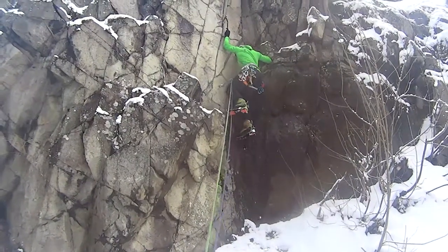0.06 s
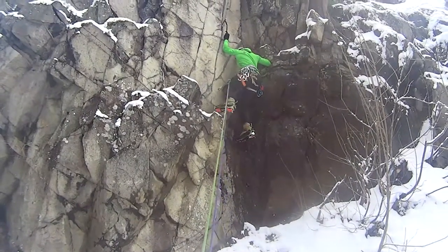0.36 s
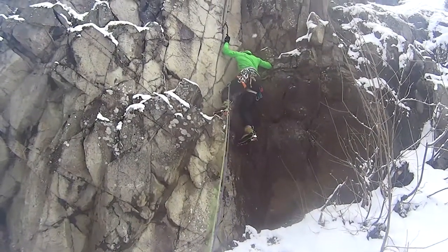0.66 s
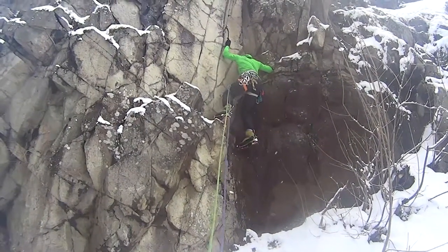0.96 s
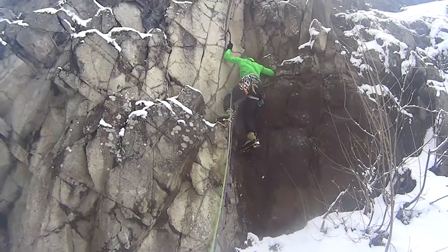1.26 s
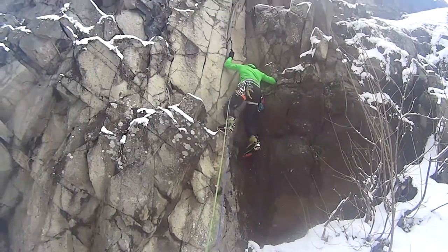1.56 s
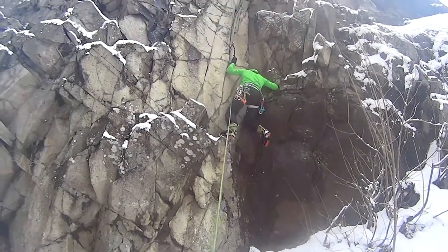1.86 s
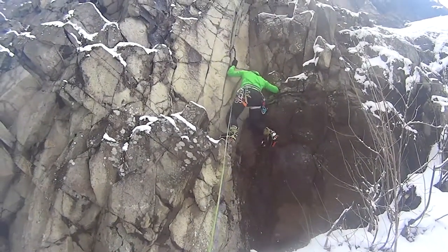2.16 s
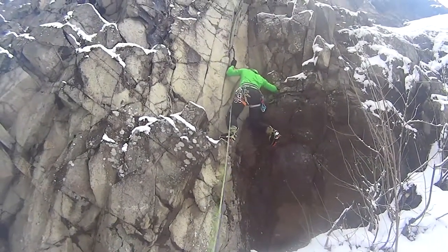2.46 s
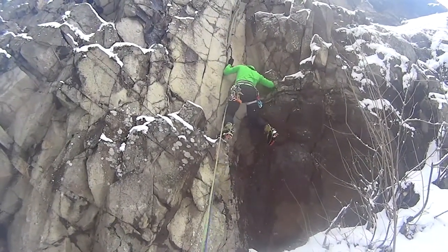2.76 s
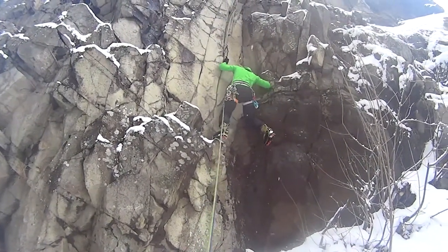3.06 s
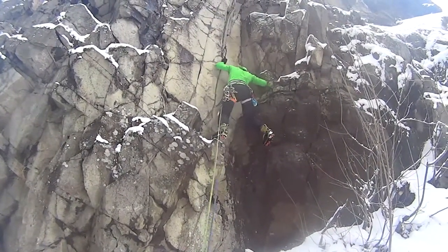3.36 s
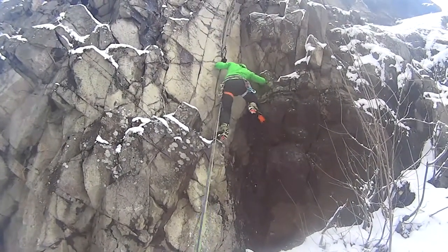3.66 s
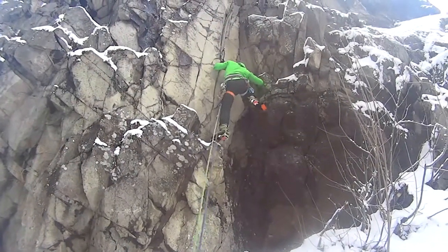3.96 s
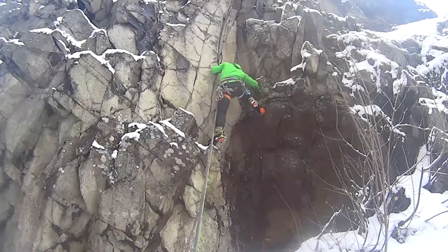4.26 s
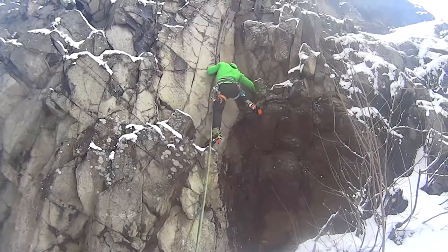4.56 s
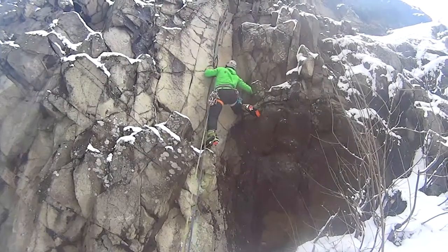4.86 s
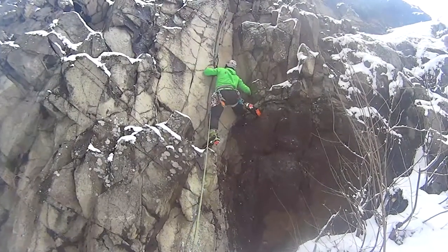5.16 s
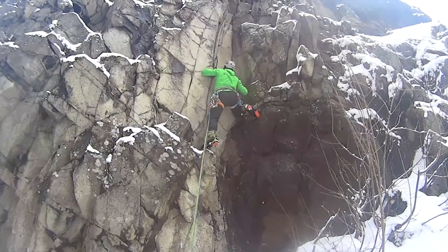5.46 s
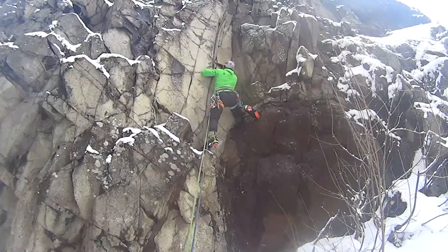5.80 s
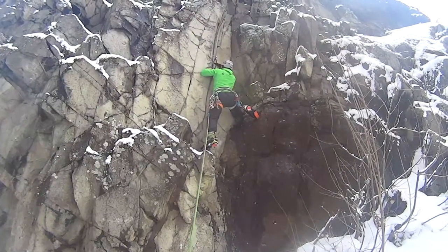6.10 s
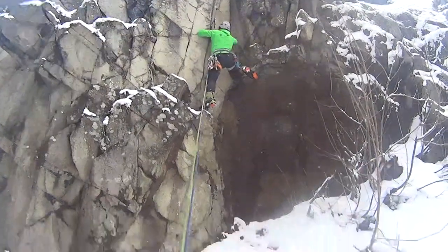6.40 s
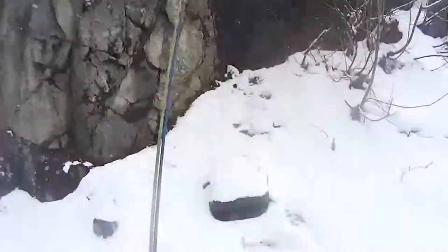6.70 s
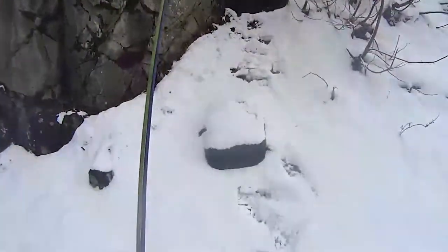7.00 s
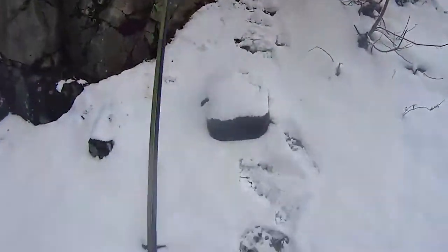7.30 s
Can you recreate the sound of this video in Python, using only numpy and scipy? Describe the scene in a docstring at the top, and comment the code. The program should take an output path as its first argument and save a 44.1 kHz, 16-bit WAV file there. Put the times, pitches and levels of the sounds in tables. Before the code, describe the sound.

Outdoors at a snowy cliff, a climber's steel picks and boot spikes tap and scratch the rock in uneven clusters, with a faint echo. Carabiners clink on the harness and loose grit ticks. The strikes and jingling grow busiest just past the middle, then thin out. At the end, close to the microphone, a hood rustles faintly, the camera case bumps softly and metal rope gear snaps. Soft air hiss continues throughout.

```python
"""Climbing a snowy crag

Steel picks and crampons (boot spikes) strike and scratch the rock, and carabiners (metal clips) clink
on the harness. The cliff returns a faint echo, and the air hisses softly. At the end the belayer, who
holds the rope, looks down: a hood rustles, the camera case bumps and the rope gear snaps close by."""
import sys
import numpy as np
from scipy import signal
from scipy.fft import rfft, irfft
from scipy.io import wavfile
from scipy.ndimage import uniform_filter1d

SR = 44100
rng = np.random.default_rng(int(sys.argv[2]) if len(sys.argv) > 2 else 0)


def bounce(signal):
    """Save signal as a 16-bit WAV file at the path given by the first command-line argument."""
    frames = np.transpose(np.atleast_2d(signal))
    limited = np.clip(frames, -1, 1)
    pcm = np.round(limited * 32767).astype(np.int16)
    wavfile.write(sys.argv[1], SR, pcm)


N = 332514
HIT_SAMPLES = 4096
HZ = np.fft.rfftfreq(HIT_SAMPLES, 1 / SR)  # the frequencies in one hit

# Levels in all tables are relative. A "colour" says how strong each frequency is.
# steel hitting rock: t/s, skid length/s, level/dB, dull rock/dB, bright steel/dB, ring f/Hz
STRIKES = [(0.179, .001, -57, 5, -1, 1190), (0.31, 0.00042, -54, 15, -5, 2500),
           (0.5365, 0.0018, -45, -20, 4, 5230), (0.5479, 0.0055, -31.5, -4, 1, 2520),
           (0.552, 0.0052, -28.5, -0.5, 5.5, 3320), (0.893, 0.013, -45.5, 6, -2.5, 3160),
           (0.941, 0.007, -48.5, 5, -4, 4630), (0.974, 0.021, -42.5, 1, 1, 2360),
           (1.107, 0.005, -36.5, 2, 0.5, 4400), (1.192, 0.0023, -41, 4, -0.5, 4520),
           (1.302, 0.0033, -45.5, -30, 15, 7360), (1.313, 0.009, -37.5, -0.5, -3, 2450),
           (1.649, 0.0071, -43.5, 0, 2, 2760), (1.665, 0.023, -33.5, 3, 5.5, 3070),
           (1.699, .004, -37.5, -2, -1, 4330), (1.713, .003, -44.5, 4, 2, 3000),
           (1.77, 0.0049, -24, -10, 4.5, 8000), (1.777, 0.0043, -32.5, 6, 4.5, 7900),
           (1.812, 0.014, -37, -1, 2, 5450), (1.829, 0.0053, -34, 1, 1.5, 5080),
           (1.896, 0.0022, -35, -19, 12.5, 6400), (2.165, 0.0077, -40, 0, -1, 1440),
           (2.195, 0.031, -34.5, 5.5, -2.5, 1660), (2.226, 0.0052, -38, 8, 1.5, 6300),
           (2.306, 0.0026, -43, 3.5, -4, 2630), (2.339, 0.0037, -42, 4, 1, 2940),
           (2.452, 0.0069, -47, 8.5, 0.5, 4880), (2.5745, 0.00067, -35.5, 1.5, 11.5, 6260),
           (2.801, 0.016, -49.5, -16, 1, 6200), (2.896, .011, -28.5, -2, -0.5, 4280),
           (2.916, 0.003, -35, 2.5, -9, 2800), (2.927, 0.017, -28, 4, 1.5, 4460),
           (2.967, 0.0029, -33, 8, 6.5, 2940), (3.001, 0.0038, -44.5, 6, -14, 1450),
           (3.043, 0.0056, -41, 10, -7.5, 1210), (3.182, 0.0013, -45.5, 11.5, -7, 2750),
           (3.572, 0.023, -44.5, -6, -1, 4770), (3.597, .016, -34.5, 4.5, 2.5, 4800),
           (3.606, 0.0055, -33.5, -4, -2.5, 4860), (3.632, 0.0156, -30.5, -2, 3, 3370),
           (3.882, 0.0053, -43.5, -22, 1, 3620), (3.936, 0.0039, -41, 1.5, 4, 5020),
           (4.0367, 0.0028, -21, -7, -1.5, 4920), (4.0415, 0.02, -35, -1, -1, 4480),
           (4.203, 0.013, -36, -5, -8, 3370), (4.218, 0.0046, -44, -9, -3, 8350),
           (4.523, 0.00077, -38, -28, 25, 9100), (4.603, 0.0059, -25, -3.5, 3.5, 3150),
           (4.653, .0044, -32, 1, 2.5, 5300), (4.662, 0.0019, -33.5, 6.5, -6, 3180),
           (4.8035, 0.002, -22, -5, 5, 5000), (4.808, 0.011, -17.5, 0.5, 5.5, 5500),
           (4.821, 0.0046, -19.5, 1, 7, 3220), (4.868, 0.017, -36.5, 8.5, -18, 2640),
           (4.9, 0.0084, -38.5, 1, 1, 2900), (4.969, 0.0087, -40.5, 8, -4, 1236),
           (4.981, 0.0067, -36.5, 4.5, -1.5, 3160), (5.089, 0.0038, -38, -3, -1, 2610),
           (5.198, 0.00055, -38, -14, 4.5, 5000)]
# colour of steel on rock: f/Hz, level/dB
STRIKE_COLOUR = [(60, -31.5), (200, -25.5), (380, -23.5), (700, -23.5), (1100, -14.5), (1450, -4),
                 (1750, -6.5), (2150, -11), (3000, 1.26), (3900, -5), (5000, -1), (6500, -7), (8300, -5),
                 (11000, -17.5)]
# bumps on the camera case: t/s, length/s, level/dB, creak f/Hz
BUMPS = [(6.902, .005, -54, 470), (6.918, 0.012, -46.5, 510), (6.941, 0.013, -52, 510),
         (6.966, .021, -43.5, 516), (7.03, 0.015, -44.5, 490), (7.349, 0.0073, -57, 420),
         (7.441, 0.0122, -48, 420), (7.493, .012, -46, 420), (7.521, 0.016, -42, 430)]


def picks_and_crampons():
    """Steel points strike the rock, and every blow stirs the same tones in the metal."""
    # tones of the steel: f/Hz, boost/dB
    tones = [(1400, 3.5), (1560, .5), (3012, -2), (3190, -1), (3290, 2.5), (3768, -1), (5161, 6.5),
             (5283, 2), (5527, .5), (6029, 5), (6815, 5.5), (7524, 6), (8100, -1), (8387, -1.5), (9609, 7)]
    colour_db = read(STRIKE_COLOUR, HZ) + sum(db * peak(hz, width_hz=25) for hz, db in tones)
    return amp(0.44) * steel_hits(STRIKES, colour_db, ring_width_hz=160, scatter=0.97, click=0.37, t60=0.035)


def steel_hits(rows, base_db, ring_width_hz, scatter, click, t60):
    """Each blow mixes a dull knock with bright steel. A clean tap rings freely; a skid damps the ring."""
    free_db, damped_db, damping_s = 29.5, 9.5, 0.00067
    out = np.zeros(N)
    for start, length, db, dull_db, bright_db, ring_hz in rows:
        ring_db = damped_db + (free_db - damped_db) * np.exp(-length / damping_s)
        tilt_db = np.interp(HZ, [2020, 2460, 4700, 7100], [dull_db, 0, 0, bright_db])
        colour_db = base_db + tilt_db + ring_db * peak(ring_hz, ring_width_hz)
        add(out, start, amp(db) * contact(length, colour_db, click, scatter, high_t60=t60))
    return out


def contact(length, colour_db, click=0.31, scatter=0.8, low_t60=0.064, high_t60=0.11):
    """One hit: a click, a skid over tiny grains, and sound scattered by nearby surfaces."""
    t = np.arange(HIT_SAMPLES) / SR
    skid = 0.23 * evened(rng.standard_normal(HIT_SAMPLES)) + evened(grit(HIT_SAMPLES, 1200, 5.8))
    blow = unit_hit(skid * fade(np.maximum(t - length, 0), 0.0064))
    blow += click * unit_hit(t == 0)
    low_share = np.interp(HZ, [1500, 4500], [1, 0])
    noise = rfft(rng.standard_normal(HIT_SAMPLES))
    tail = irfft(noise * low_share) * fade(t, low_t60)
    tail += irfft(noise * (1 - low_share)) * fade(t, high_t60)
    blow += scatter * smear(blow, tail)
    # take out the grains' broad colour, so that the struck object sets it
    grain_db = 10 * np.log10(uniform_filter1d(abs(rfft(blow)) ** 2, size=131) + 1e-9)
    return unit_hit(colour_hit(blow, colour_db - grain_db))


def squeaks(waver=0.036):
    """A steel point sticks and slips, making a very short, unsteady tone."""
    # slips: middle t/s, half width/s, f/Hz, level/dB
    slips = [(4.212, .004, 3490, -47), (4.222, .004, 4200, -36), (4.223, 0.0035, 8350, -35.5),
             (4.925, 0.0028, 4380, -31.5), (4.987, 0.0039, 3200, -26)]
    out = np.zeros(N)
    t = np.arange(-HIT_SAMPLES // 2, HIT_SAMPLES // 2) / SR
    for middle, width, hz, db in slips:
        wobble = evened(uniform_filter1d(rng.standard_normal(HIT_SAMPLES), size=25))
        pitch = hz * (1 + waver * wobble)
        tone = np.sin(2 * np.pi * np.cumsum(pitch) / SR)
        add(out, middle + t[0], amp(db) * np.exp(-(t / width) ** 2) * tone)
    return out


def boots(frame_t60=0.04):
    """A hard kick makes the boot knock dully, and the skid briefly rings the crampon's frame."""
    # kicks: t/s, length/s, knock/dB, frame f/Hz, frame ring/dB
    kicks = [(0.552, 0.0028, -48.5, 1560, -42.5), (1.038, 0.0053, -57, 1230, -58),
             (2.204, 0.033, -58, 1640, -40), (2.935, 0.0067, -50.5, 1470, -60),
             (3.646, 0.0046, -81, 1422, -40.5), (4.043, 0.0053, -52.5, 1424, -35),
             (4.614, .008, -57.5, 1620, -54), (4.659, 0.011, -51.5, 1460, -78),
             (4.812, 0.014, -39.5, 1646, -55)]
    # colour of the boot's shell: f/Hz, level/dB
    shell_colour = [(60, -26), (130, -22), (220, -7), (300, -12.5), (400, 0), (500, -5.5), (650, -30),
                    (850, -7.5), (1100, -10.5), (3000, -54)]
    out, t = np.zeros(N), np.arange(HIT_SAMPLES) / SR
    for start, length, db, frame_hz, frame_db in kicks:
        add(out, start, amp(db) * contact(length, read(shell_colour, HZ), click=0.73, scatter=0.95))
        skid = rng.standard_normal(HIT_SAMPLES) * np.exp(-t / length)
        ring = np.sin(2 * np.pi * frame_hz * t) * fade(t, frame_t60)
        frame = signal.fftconvolve(skid, ring)[:HIT_SAMPLES]
        add(out, start, amp(frame_db - 2.5) * unit_hit(frame))
    return out


def carabiners(hits=3, bounce_db=-9.5, soften_db=-4, gap_s=(0.0045, 0.024)):
    """Carabiners knock together and bounce at uneven gaps, each bounce weaker and softer."""
    # knocks: t/s, level/dB, high tones/dB, clack/dB, base fade time/s
    knocks = [(0.068, -52.5, 1.5, 4, 0.2), (0.702, -50.5, -24, -1, .06), (0.793, -41, -10.5, -12, 0.084),
              (0.822, -47.5, -25, -7, 0.26), (0.965, -45, -16, -8, 0.048), (1.858, -37.5, -12, -20, 0.073),
              (1.943, -56.5, 4.5, -2, .2), (3.299, -37.5, -4.5, -24, 0.048), (3.387, -57, 1, 5, .23),
              (3.539, -51, -7, 0.5, 0.2), (3.74, -59, -20, 8, 0.13), (3.853, -44, -2, 8.5, .25),
              (3.917, -45, -3, -4, .12), (3.946, -38, -7, -12, 0.081), (3.973, -44.5, -4, 4, 0.13),
              (3.995, -32, -9, -10, .1), (4.007, -35, -4.5, 0, 0.13), (4.149, -35, -9.5, -15, .14),
              (4.298, -50, -13, 0.5, 0.12), (4.39, -44, -11, -3.5, .25), (4.461, -49, 0, 0.5, .09),
              (4.482, -41, -1, -18, 0.1), (4.507, -28, -10, -9, 0.016), (4.569, -48.5, 5.5, -2, .09),
              (4.587, -41, -4, -5, .1), (4.726, -47, -6.5, -16, 0.087), (4.766, -34.5, -13, -4, 0.06),
              (5.076, -42, -4, -2, 0.042), (5.116, -38, -4.5, -8, 0.066),
              (5.552, -44.5, -11.5, -8.5, 0.068), (5.662, -61.5, 5.5, 9, .22),
              (5.745, -52.5, -18, -4, 0.076), (6.213, -50.5, 3.5, 2, 0.027)]
    out = np.zeros(N)
    for start, db, high_db, clack_db, t60 in knocks:
        for k in range(hits):
            add(out, start, amp(db + k * bounce_db) * clink(high_db, clack_db + k * soften_db, t60))
            start += rng.uniform(*gap_s)
    return out


def clink(high_db, clack_db, t60, detune=0.0055, uneven_db=3.5):
    """One carabiner clacks and rings, tuned and struck a little differently each time."""
    # tones of a carabiner: f/Hz, level/dB, factor on the fade time
    metal_tones = [(2580, -25.5, 2.8), (4800, -2, 1.4), (4920, 1, 1.17), (4880, -18.5, 12),
                   (5030, -6.5, 1.2), (5300, -20, 0.81), (5630, -31, 1), (7100, -2, 1.5), (7770, -4, 0.52),
                   (8960, 3.5, 1), (9100, -1.5, 1)]
    # colour of the clack: f/Hz, level/dB
    clack_colour = [(500, -69), (2000, -12), (3000, 1.5), (4200, -8.5), (5400, 11), (6500, 0.5),
                    (8200, -2.5), (9600, 3.5), (11000, -26)]
    t = np.arange(SR // 4) / SR
    hz, tone_db, hold = np.transpose(metal_tones)[:, :, None]
    pitch = hz * (1 + detune * rng.standard_normal(hz.shape))
    strength = amp(tone_db + uneven_db * rng.standard_normal(hz.shape))
    tones = strength * np.sin(2 * np.pi * (pitch * t + rng.random(hz.shape))) * fade(t, t60 * hold)
    high = hz[:, 0] > 6500
    ring = unit_hit(tones[~high].sum(0)) + amp(high_db) * unit_hit(tones[high].sum(0))
    ring *= 1 - np.exp(-t / 0.0001)  # a very quick fade-in
    add(ring, 0, amp(clack_db) * contact(0.0036, read(clack_colour, HZ), scatter=0.93, high_t60=0.044))
    return ring


def belay_gear():
    """The metal gear that holds the rope snaps close by."""
    # snaps: t/s, skid length/s, level/dB, dull knock/dB, bright steel/dB, ring f/Hz
    snaps = [(6.939, 0.0063, -54, 13, 5, 2650), (6.973, 0.0011, -40.5, 5, 14, 10200),
             (6.98, 0.0034, -38, -4, 10.5, 9200), (7.0095, 0.0013, -42, -9, 3, 5270),
             (7.0297, 0.0026, -34, -3, 5, 2690), (7.0365, 0.0051, -32, 4, 8.5, 5300),
             (7.056, 0.0027, -46, 0, 10, 5160), (7.09, 0.0063, -50, 10, 2, 6540),
             (7.262, .005, -53, 8, 4, 3920), (7.302, 0.0022, -52.5, 8, 2, 2740),
             (7.45, 0.0035, -43.5, -2, 12.5, 5160), (7.48, 0.0014, -52, -1, 0, 4550)]
    # colour of a snap: f/Hz, level/dB
    snap_colour = [(200, -15), (1000, -36), (2300, -21), (2800, -3.5), (3600, -11.5), (4500, -10.5),
                   (5250, 2.5), (6000, -7), (7000, -14), (8700, -18), (9400, -9.5), (11000, -26)]
    colour_db = read(snap_colour, HZ)
    return amp(3.0) * steel_hits(snaps, colour_db, ring_width_hz=200, scatter=0.64, click=0.67, t60=0.042)


def camera_case(thud_db=-3, creak_db=12):
    """The case thuds (mid) and creaks as it bends (side) when the belayer's head turns."""
    # colour of the bending case, opposite in the two microphones: f/Hz, level/dB
    bend_colour = [(50, -26), (150, -19), (300, -6), (500, -7), (680, -20), (1500, -29), (3000, -40)]
    # colour of the thud, alike in both: f/Hz, level/dB
    thud_colour = [(30, -7), (80, -5), (200, -10), (350, 4), (520, 3.5), (700, -15), (900, -1),
                   (1300, -3.5), (1900, -18), (4000, -24)]
    mid, side = np.zeros((2, N))
    for start, length, db, hz in BUMPS:
        bend_db = read(bend_colour, HZ) + creak_db * peak(hz, width_hz=60)
        add(mid, start, amp(db + thud_db) * contact(length, read(thud_colour, HZ), scatter=0.95))
        add(side, start, amp(db) * contact(length, bend_db, scatter=0.4))
    return np.array([mid, side])


def scraping(drag_db=-2, floor_db=-63, trickle_t60=0.53):
    """Fine grains scratch under dragged spikes and cloth; loose grit trickles after every blow."""
    # the climber's effort, heard as scratching: t/s, level/dB
    effort = [(0.0, -54.5), (0.48, -62), (0.75, -55), (1.49, -63.5), (1.8, -53.5), (2.41, -59.5),
              (2.96, -53), (3.44, -61.5), (4.09, -45.5), (4.2, -55.5), (4.45, -55.5), (4.77, -51),
              (5.4, -60), (5.92, -61), (6.72, -60.5), (7.08, -53.5), (7.54, -58)]
    # soft slides of a boot or sleeve: middle t/s, half width/s, level/dB
    slides = [(1.55, 0.18, -59), (2.68, 0.043, -64), (3.405, 0.033, -58.5), (4.905, 0.033, -45.5),
              (5.13, 0.043, -55), (5.36, 0.048, -61), (5.99, 0.018, -59)]
    # colour of the scratching: f/Hz, level/dB
    scrape_colour = [(200, -29), (800, -9.5), (1400, -6.5), (2100, -11.5), (3000, 0.5), (3900, -6),
                     (5000, 2), (6500, -6.5), (8500, -6), (11000, -24)]
    t, trickle_power = np.arange(SR) / SR, np.zeros(N)
    for start, _, blow_db, *_ in STRIKES:
        loose_db = -55 + 0.59 * (blow_db + 25.5)  # harder blows loosen more grit
        add(trickle_power, start, (amp(loose_db) * fade(t, trickle_t60)) ** 2)
    drag_power = amp(drag_db) ** 2 * np.maximum(follow(effort) ** 2 - amp(floor_db) ** 2, 0)
    loudness = np.sqrt(drag_power + trickle_power) + swells(slides)
    grains = evened(grit(N, 1500, 4.6)) + 0.89 * rng.standard_normal(N)
    return loudness * colour_noise(grains, scrape_colour)


def chips(from_s=0.082, until_s=5.8, per_s=7, ring_db=10):
    """Small chips tick on the rock at random moments, each with its own pitch."""
    out, span = np.zeros(N), until_s - from_s
    for when, pitch, size in rng.random((round(per_s * span), 3)):
        colour_db = read(STRIKE_COLOUR, HZ) + ring_db * peak(1200 + 6000 * pitch, width_hz=400)
        tick = contact(0.001, colour_db, high_t60=0.025)
        add(out, from_s + when * span, amp(-70.25 + 15 * size) * tick)
    return out


def cliff_echo(x, delay_s=0.052, low_t60=0.31, high_t60=0.22, treble_db=-5, split_hz=2800):
    """The far walls of the crag return a dull, scattered echo after a short gap."""
    t = np.arange(SR // 2) / SR
    reflections = grit(len(t), 2000, 0.78)
    low = signal.sosfilt(signal.butter(2, split_hz, fs=SR, output="sos"), reflections)
    high = signal.sosfilt(signal.butter(2, split_hz, "high", fs=SR, output="sos"), reflections)
    arrival = np.interp(t, [0, 0.87 * delay_s, delay_s], [0, 0.11, 1])
    tail = low * fade(t, low_t60) + amp(treble_db) * high * fade(t, high_t60)
    return smear(x, tail * arrival)


def hood():
    """The belayer's hood rubs against the camera with a soft crackle."""
    # strength of the rubbing: t/s, level/dB
    rubbing = [(6.4, -74), (6.55, -66), (6.65, -68.5), (6.76, -67.5), (6.88, -67), (7.1, -68), (7.33, -69),
               (7.42, -72)]
    # colour of the cloth: f/Hz, level/dB
    cloth_colour = [(100, -11), (400, 3.5), (700, -1), (1050, 4.5), (1350, 1), (2000, -10), (2800, 8),
                    (3800, -41), (5200, -22), (8000, -41)]
    return follow(rubbing) * colour_noise(grit(N, 3000, 7.4), cloth_colour)


def air(mid_db=-63.0, side_db=-59.5, jolt_db=-23, jolt_s=0.039):
    """Steady hiss and a gusty rumble that swells when a bump jolts the camera, as mid and side."""
    # still air and microphone hiss, alike in both microphones: f/Hz, level/dB
    mid_colour = [(15, -34), (25, -12.5), (46, -3.5), (66, -8.5), (112, -7), (202, -7.5), (267, -8),
                  (303, -8.5), (344, -8), (444, -9.5), (907, -13.5), (1230, -12.5), (1850, -13),
                  (11000, -17), (14300, -78), (22000, -120)]
    # the part that is opposite in the two: f/Hz, level/dB
    side_colour = [(15, -50), (25, -16), (96, -19), (169, -9), (247, -12), (288, -5.5), (819, -5.5),
                   (884, -6.5), (1030, -4.5), (9200, -20), (11000, -26), (14300, -50), (22000, -120)]
    # rumble of air on the camera: t/s, level/dB
    breeze = [(0, -83), (1.5, -69), (3.4, -80), (4.3, -68), (6.0, -83), (6.6, -69), (7.54, -65)]
    # colour of the rumble: f/Hz, level/dB
    rumble_colour = [(10, -18), (25, 8), (45, -5.0), (70, -10.5), (200, -21.5), (800, -62)]
    mid = colour_noise(rng.standard_normal(N), mid_colour)
    side = colour_noise(rng.standard_normal(N), side_colour)
    rumble = colour_noise(rng.standard_normal(N), rumble_colour)
    gust_db = np.interp(np.arange(N), np.linspace(0, N, 50), rng.normal(-2, 2, 50))
    jolts = swells([(start, jolt_s, db + jolt_db) for start, _, db, _ in BUMPS])
    flow = amp(gust_db) * follow(breeze) + jolts
    return np.array([amp(mid_db) * mid + flow * rumble, amp(side_db) * side])


def microphones(x, spread_t60=0.043):
    """High sounds are alike on both sides (mid); lower ones spread wide and differ between left and right
    (side)."""
    # stereo width: f/Hz, side minus mid/dB
    width = [(60, -10), (200, -14), (450, 4), (750, -1.5), (1200, -13), (2000, -9), (3500, -20),
             (11000, -14)]
    # lean to one side: f/Hz, pan (left is positive)
    lean = [(100, 0), (600, -0.033), (1150, -0.41), (2000, -0.011), (3500, -0.0049), (11000, -0.059)]
    t = np.arange(SR // 50) / SR
    apart = smear(x, rng.standard_normal(len(t)) * fade(t, spread_t60))
    side = filtered(apart, amp(read(width, HZ))) + filtered(x, read(lean, HZ))
    return np.array([x, side])


def amp(db):
    """Turns decibels into a gain."""
    return 10 ** (np.asarray(db) / 20)


def evened(x):
    """Scales a sound to an average power of 1."""
    return x / np.sqrt(np.mean(x ** 2) + 1e-20)


def unit_hit(x):
    """Scales a hit to the energy of a hundredth of a second at full level."""
    return x * np.sqrt(SR / 100 / (np.sum(x ** 2) + 1e-20))


def read(points, hz):
    """Joins table points with straight lines on a log-frequency axis."""
    f, value = np.transpose(points)
    return np.interp(np.log(hz + 1), np.log(f + 1), value)


def follow(curve):
    """Turns a level curve into a gain for every sample."""
    return amp(np.interp(np.arange(N) / SR, *np.transpose(curve)))


def swells(rows):
    """Soft rises and falls of level."""
    t = np.arange(N) / SR
    return sum(amp(db) * np.exp(-((t - middle) / width) ** 2) for middle, width, db in rows)


def fade(t, t60):
    """Dies away by 60 dB every t60 seconds."""
    return 10 ** (-3 * t / t60)


def peak(hz, width_hz):
    """The hump that one ringing tone makes in a colour, 1 at its centre."""
    return 1 / (1 + ((HZ - hz) / width_hz) ** 2)


def grit(size, per_s, spread_db):
    """Scattered clicks, a few much larger than the rest."""
    sizes = amp(spread_db * np.minimum(rng.exponential(1, size), 3))
    return sizes * rng.choice([-1, 1], size) * (rng.random(size) < per_s / SR)


def smear(x, tail):
    """Spreads a sound out in time along a tail of reflections."""
    return signal.fftconvolve(x, tail / np.linalg.norm(tail))[:len(x)]


def filtered(x, gain):
    """Filters a whole track, given a gain for each frequency in HZ."""
    return irfft(rfft(x) * np.interp(np.fft.rfftfreq(N, 1 / SR), HZ, gain), N)


def colour_noise(noise, colour):
    """Gives noise a colour and an average power of 1."""
    return evened(filtered(noise, amp(read(colour, HZ))))


def colour_hit(x, colour_db):
    """Colours a hit so that nothing sounds before it starts (a minimum-phase filter)."""
    log_gain = np.log(amp(np.r_[colour_db, colour_db[-2:0:-1]]))
    response = np.fft.ifft(np.exp(np.conj(signal.hilbert(log_gain)))).real
    return signal.fftconvolve(x, response)[:len(x)]


def add(mix, start, sound):
    """Mixes a sound in at a start time in seconds."""
    part = mix[max(round(start * SR), 0):][:len(sound)]
    part += sound[:len(part)]


def scene():
    """Mixes the climber, the belayer, their echoes and the air into left and right."""
    tools = picks_and_crampons()
    belay = belay_gear()
    climber = tools + squeaks() + boots() + carabiners() + scraping() + chips()
    echoes = amp(-21.5) * cliff_echo(climber) + amp(-19.0) * cliff_echo(belay)
    mid, side = microphones(climber + belay + echoes + hood()) + camera_case() + air()
    return np.array([mid + side, mid - side])


def record(dry, cutoff_hz=11130):
    """The microphones round off the hardest blows, and the camera cuts the highest treble."""
    lowpass = signal.firwin(401, cutoff_hz, window=("kaiser", 7), fs=SR)
    return signal.oaconvolve(np.tanh(dry), lowpass[None], "same")


dry = scene()
out = record(dry)
bounce(out)
```